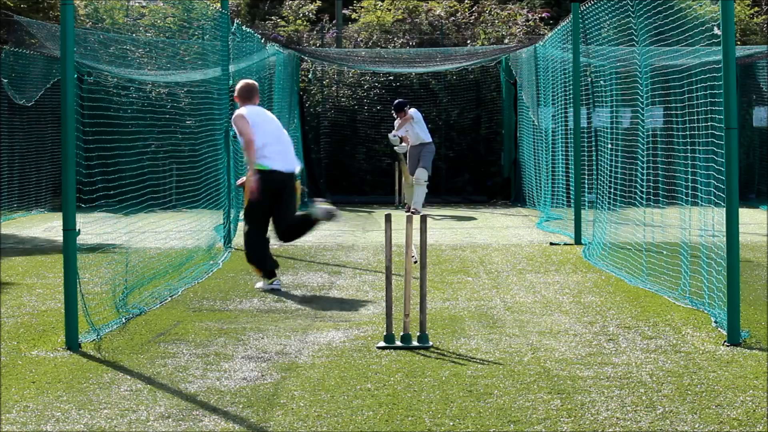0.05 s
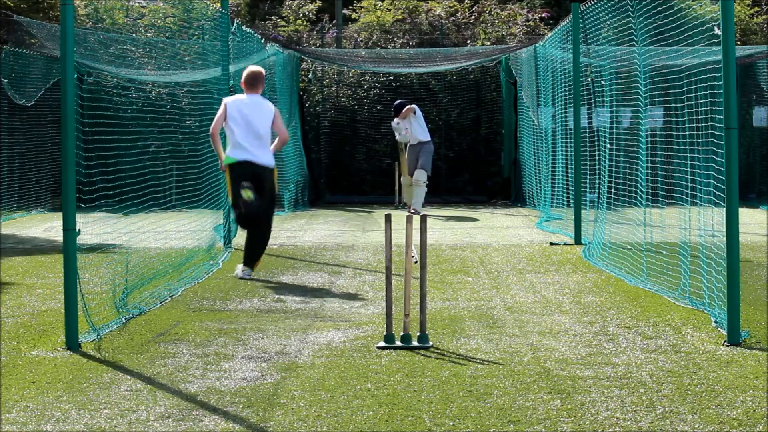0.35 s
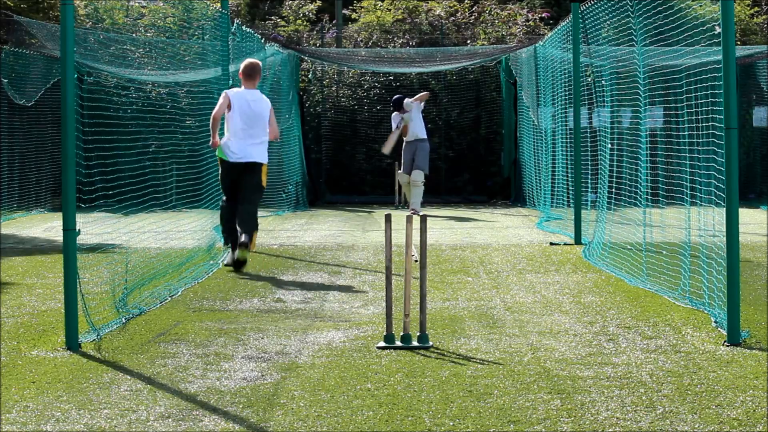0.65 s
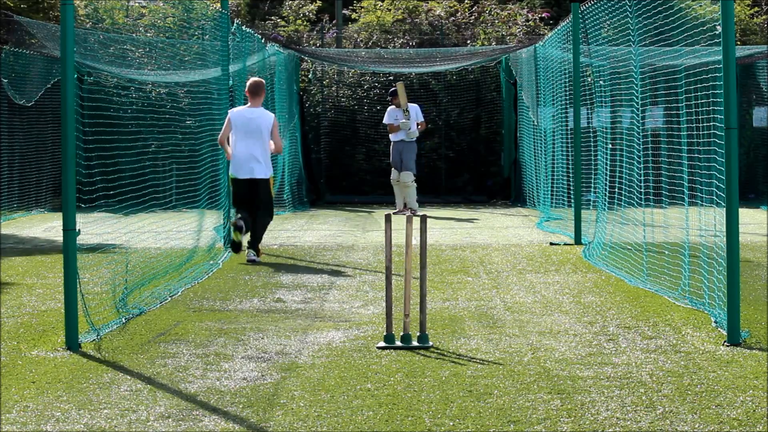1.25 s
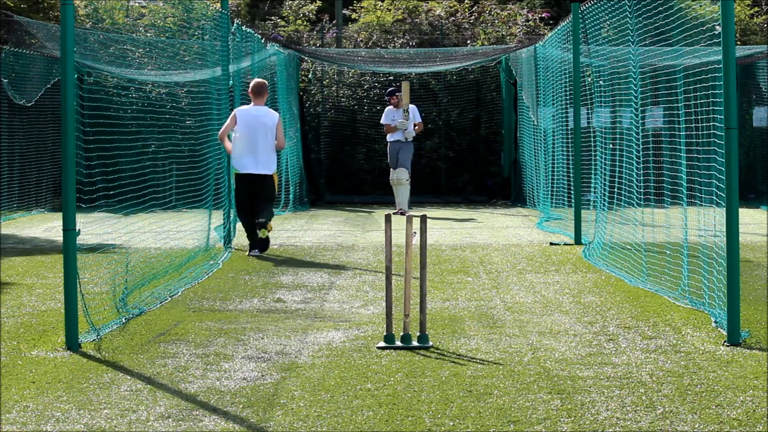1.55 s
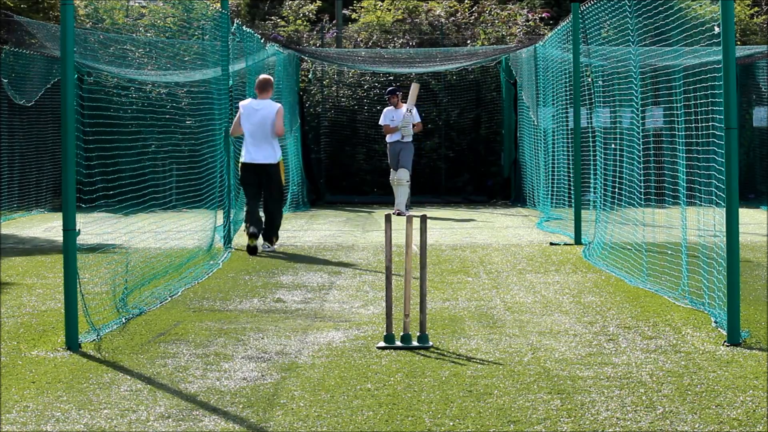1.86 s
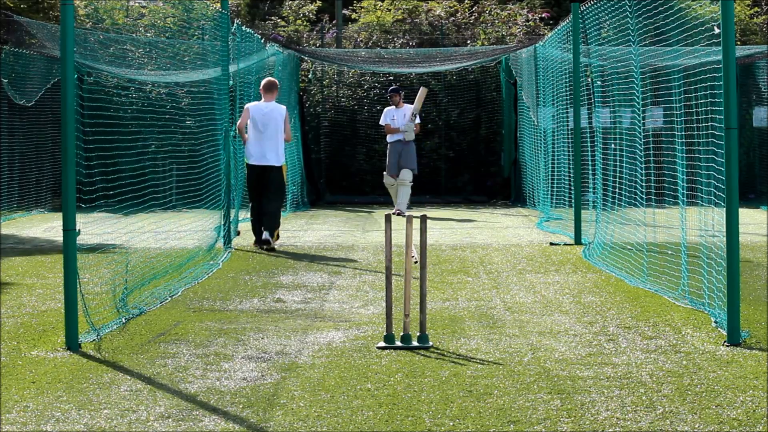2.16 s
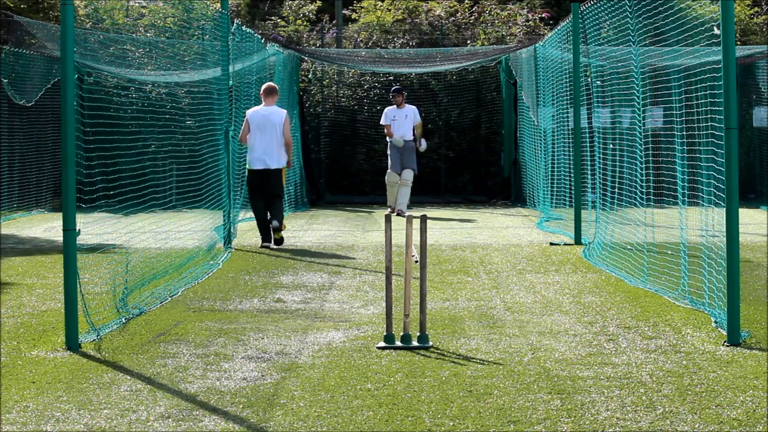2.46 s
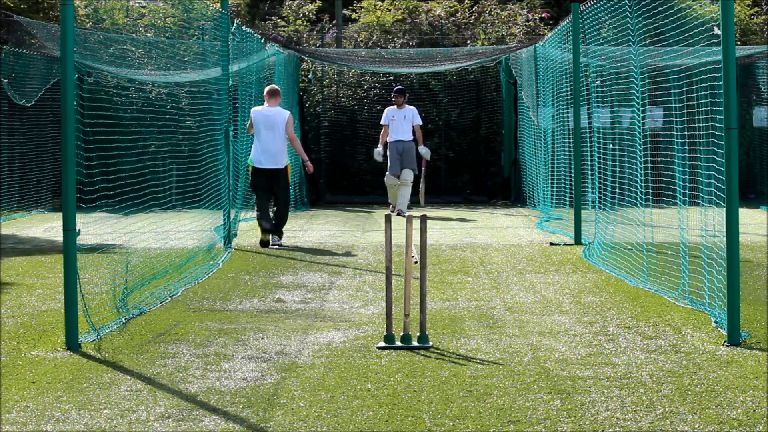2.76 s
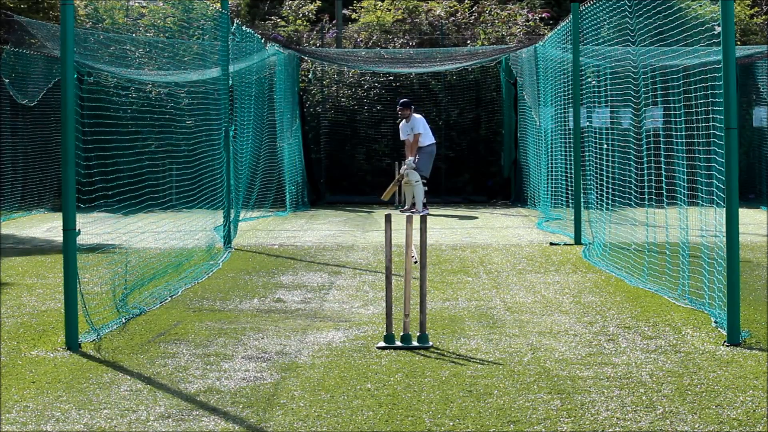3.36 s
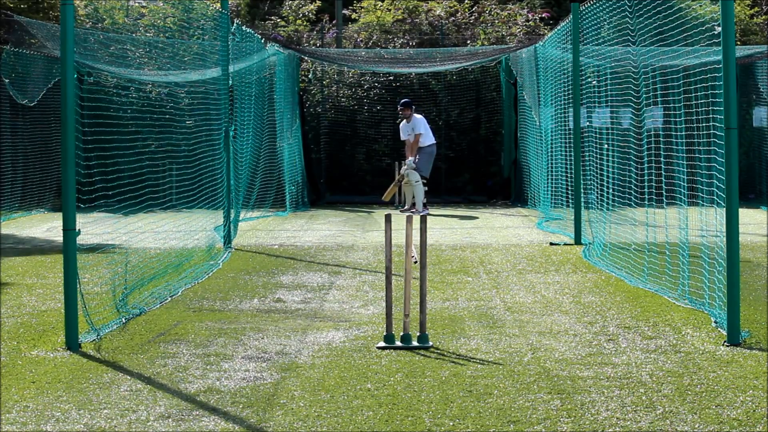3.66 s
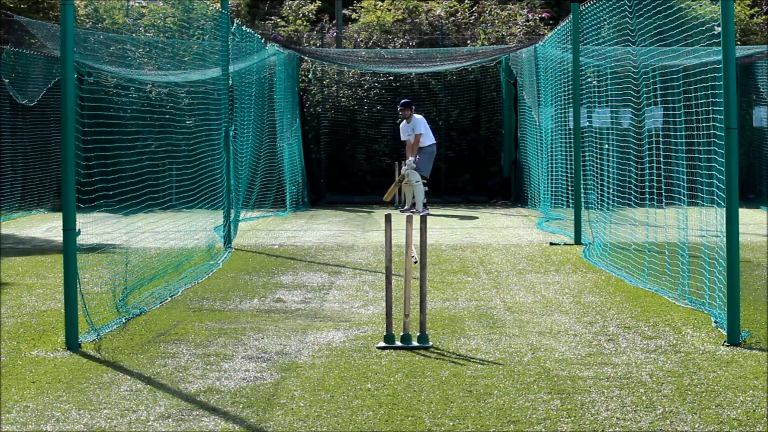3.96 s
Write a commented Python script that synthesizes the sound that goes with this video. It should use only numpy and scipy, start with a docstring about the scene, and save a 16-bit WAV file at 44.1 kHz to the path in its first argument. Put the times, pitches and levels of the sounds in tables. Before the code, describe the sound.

A cricket bat hits a ball with one sharp wooden knock over faint distant traffic.

```python
"""First comes one hard wooden knock, loud enough to overload the microphone: a cricket bat meets the
ball in an outdoor practice net. Walls throw the knock back dully, the yard rings briefly and the ball
thuds away. Distant traffic and a low drone lie under it all. In the last second something rustles
and scuffs on the artificial turf nearby."""
import sys
import numpy as np
from scipy import signal
from scipy.fft import rfft, irfft
from scipy.io import wavfile

SR = 44100
rng = np.random.default_rng(int(sys.argv[2]) if len(sys.argv) > 2 else 0)


def file_out(sig):
    """Save sig as 16-bit WAV at sys.argv[1]."""
    # one column per channel
    cols = np.atleast_2d(sig).T
    # limit, then scale
    lim = np.clip(cols, -1, 1)
    pcm = np.round(lim * 32767).astype(np.int16)
    wavfile.write(sys.argv[1], SR, pcm)


N = 176400  # 4 seconds
HIT_S = .0277  # when the bat meets the ball

# The tones of bat and ball. Columns: pitch_hz, level_db, fade_s (time to fade by 60 dB)
BAT_TONES = [(318, -5.5, 0.017), (812, -2, 0.014), (1160, -10.5, 0.015), (1760, -18, 0.017),
             (2190, -5, 0.014), (3070, -11, 0.0079), (3750, -9.5, 0.0093), (4470, -16, .004),
             (5420, -11, 0.0044), (6080, -14, 0.0049)]
# How strong the crack is from low to high pitch. Columns: pitch_hz, level_db
CRACK_COLOUR = [(1000, -19), (2800, 2), (6000, -2), (7200, -8), (12500, -0.5), (15500, -22)]
def knock():
    """The contact cracks and the wood rings briefly, its lowest tones swelling last."""
    swell_s, lowest_hz = .000706, BAT_TONES[0][0]
    wood = 0
    for pitch_hz, level_db, fade_s in BAT_TONES:
        tone = np.sin(2 * np.pi * pitch_hz * (since(HIT_S) - swell_s))
        rise_s = .0001 + swell_s * lowest_hz / pitch_hz
        wood += undb(level_db) * tone * decay(HIT_S, fade_s, rise_s)
    crack = colour(rng.standard_normal(N), CRACK_COLOUR) * decay(HIT_S, .012, rise=.0001)
    return undb(3) * wood + undb(-17.5) * crack


# Echoes from the walls. Columns: delay_s, level_db, treble_cutoff_hz
WALL_ECHOES = [(.0095, -25, 9000), (0.0384, -12, 2300), (0.0452, -22, 2600)]
def wall_echoes(sound):
    """Each wall sends back one later, quieter, duller copy of the sound."""
    samples = np.arange(N)
    echoes = 0
    for delay_s, level_db, cutoff_hz in WALL_ECHOES:
        delayed = np.interp(samples - delay_s * SR, samples, sound, left=0)
        echoes += undb(level_db) * dull(delayed, cutoff_hz)
    return echoes


# Blurred echoes. Columns: delay_s, level_db, fade_s
FAR_ECHOES = [(.048, -25.5, 0.17), (0.141, -30.5, 0.33)]
# Their tone colour. Columns: pitch_hz, level_db
FAR_COLOUR = [(250, -28), (520, -5), (740, 0), (1050, 4.5), (1550, -17), (2150, -6), (2800, -17),
              (6000, -29), (15000, -55)]
def far_echoes():
    """Hedges and far walls smear the bat's middle tones into short washes of noise."""
    loudness = sum(undb(level_db) * decay(HIT_S + delay_s, fade_s, rise=.0031)
                   for delay_s, level_db, fade_s in FAR_ECHOES)
    return colour(rng.standard_normal(N), FAR_COLOUR) * loudness


# The ring of the yard. Columns: pitch_hz, level_db, fade_s
YARD_RING = [(120, -6, 0.59), (260, -2, .4), (483, -20, 0.93), (746, 0.5, 0.98), (1080, -7.5, 1),
             (1510, -11, 0.74), (2170, -6, 1), (2650, -13, 0.83), (4030, -17.5, 0.69), (7000, -23.5, 0.53),
             (15000, -30, 0.28)]
# Tone colour of the first bounces. Columns: pitch_hz, level_db
SCATTER_COLOUR = [(150, -19), (330, 10), (900, -19), (1500, -3), (2200, 6), (3000, 2), (6000, -6),
                  (9000, -15), (15000, -24)]
def yard():
    """The knock scatters off posts and ground, then leaves a ring whose highest part dies first."""
    pitches_hz, _, fades_s = np.array(YARD_RING).T
    wash = colour(rng.standard_normal(N), YARD_RING)
    ring = 0
    for share, fade_s in zip(np.eye(len(pitches_hz)), fades_s):
        # Pick out the noise around one pitch, so it can fade at its own speed.
        part = shape(wash, lambda hz: np.interp(np.log(hz), np.log(pitches_hz), share))
        ring += part * decay(HIT_S, fade_s, rise=.0048)
    scatter = colour(rng.standard_normal(N), SCATTER_COLOUR) * decay(HIT_S, .11, rise=.0011)
    return undb(-28) * ring + undb(-25) * scatter


# Soft thuds. Columns: start_s, level_db, pitch_hz, fade_s
GROUND_THUDS = [(0.1444, -24.5, 260, 0.055), (3.003, -36, 250, 0.076), (3.043, -33, 750, 0.037),
                (3.108, -33, 450, 0.06), (3.385, -28.5, 383, 0.085), (3.53, -34.5, 684, .06),
                (3.56, -38.5, 115, 0.16), (3.592, -40.5, 1190, 0.13), (3.864, -36, 780, 0.067)]
def thuds():
    """Ball and feet land on soft ground with short, dull blows."""
    return sum(undb(level_db) * band(pitch_hz, 2.1 * pitch_hz) * decay(start_s, fade_s, rise=.0016)
               for start_s, level_db, pitch_hz, fade_s in GROUND_THUDS)


def grains():
    """Gritty noise: each sample gets a random boost of up to 15 dB."""
    return rng.standard_normal(N) * undb(3 * np.minimum(rng.exponential(size=N), 5))


# Tone colour of the rustle. Columns: pitch_hz, level_db
RUSTLE_COLOUR = [(150, -31), (400, 1.5), (1000, 1.5), (2200, -10), (4500, -23), (9000, -25), (15000, -27)]
# Scuffs on the turf. Columns: start_s, length_s, level_db
TURF_SCUFFS = [(3.18, 0.032, -50), (3.264, 0.02, -43), (3.317, 0.19, -49.5), (3.588, 0.1, -45),
               (3.818, 0.023, -57), (3.854, 0.041, -43.5), (3.896, 0.042, -44.5), (3.955, 0.05, -64)]
# Their tone colour. Columns: pitch_hz, level_db
SCUFF_COLOUR = [(500, 7.5), (2000, 2), (4500, -0.5), (9000, -9), (13500, -8), (16000, -11)]
# Ticks of grit. Columns: start_s, level_db, pitch_hz, width_hz, fade_s
GRIT_TICKS = [(3.323, -31.5, 1900, 900, 0.046), (3.3418, -26, 3130, 2970, 0.0085),
              (3.433, -43, 13000, 7000, .012), (3.709, -33.5, 4000, 6000, 0.0083),
              (3.782, -41, 12000, 12000, 0.0096), (3.966, -45, 12800, 4000, .014)]
def turf():
    """Something rubs over the turf: an uneven rustle, gritty scuffs and a few ticks."""
    start_s, rise_s = 2.99, .031
    fade_in = np.minimum(since(start_s) / rise_s, 1)
    rustle = colour(grains(), RUSTLE_COLOUR) * fade_in * undb(-44.5 + 2.5 * walk(12))
    pressure = sum(undb(level_db) * np.sin(np.pi * np.minimum(since(start_s) / length_s, 1))
                   for start_s, length_s, level_db in TURF_SCUFFS)
    ticks = sum(undb(level_db) * band(pitch_hz, width_hz) * decay(start_s, fade_s, rise=.0001)
                for start_s, level_db, pitch_hz, width_hz, fade_s in GRIT_TICKS)
    scuffs = pressure * colour(grains(), SCUFF_COLOUR)
    return rustle + scuffs + ticks


# Tone colour of distant traffic. Columns: pitch_hz, level_db
TRAFFIC_COLOUR = [(12, -53), (20, -23.5), (53, -3), (85, -6), (122, -4), (175, -6.5), (213, -6),
                  (252, -5.5), (289, -6.5), (324, -9), (362, -11.5), (857, -7.5), (1450, -12), (2270, -21),
                  (3350, -25), (8400, -37), (15500, -41)]
# How loud the engine drone is over time. Columns: time_s, level_db
DRONE_LEVELS = [(0, -51), (1.2, -52.5), (2.1, -48.5), (2.85, -52.5), (3.05, -70), (4, -74)]
def traffic():
    """Far traffic blends into a wash that swells slightly, with one low engine drone."""
    wash = colour(rng.standard_normal(N), TRAFFIC_COLOUR)
    swell_db = .35 * walk(.81)
    flicker_db = .45 * walk(27)
    drone_db = np.interp(since(0), *np.array(DRONE_LEVELS).T)
    drone = band(hz=210.5, width_hz=15.2) * undb(drone_db)
    return wash * undb(-40 + swell_db + flicker_db) + drone


def scene():
    """The knock and its echoes over the quieter sounds, in one channel."""
    hit = knock()
    return (hit + wall_echoes(hit) + far_echoes() + yard() + thuds() + traffic() + turf())[None]


def record(dry):
    """The overload flattens the knock's peaks, then the highest treble is cut away."""
    cutoff_hz = 15800
    treble_cut = signal.ellip(10, .1, 70, cutoff_hz, fs=SR, output="sos")
    return signal.sosfilt(treble_cut, np.clip(dry, -1, 1))


# Small tools used by the sounds above.
def undb(db):
    """Turn decibels into a number to multiply by."""
    return 10 ** (np.asarray(db) / 20)


def unit(x):
    """Scale a sound to an average strength (rms) of 1."""
    return x / np.sqrt(np.mean(x ** 2))


def shape(x, gain):
    """Turn each pitch up or down by gain(hz)."""
    hz = np.maximum(np.arange(N // 2 + 1) * SR / N, 1)
    return irfft(rfft(x) * gain(hz), N)


def colour(x, points):
    """Give a sound a tone colour from (pitch_hz, level_db) rows, at strength 1."""
    pitches_hz, levels_db = np.array(points).T[:2]
    return unit(shape(x, lambda hz: undb(np.interp(np.log(hz), np.log(pitches_hz), levels_db))))


def band(hz, width_hz):
    """Noise gathered around one pitch, at strength 1."""
    return unit(shape(rng.standard_normal(N), lambda f: 1 / (1 + ((f - hz * hz / f) / width_hz) ** 2)))


def dull(x, hz):
    """Soften the treble above hz."""
    return signal.sosfilt(signal.butter(2, hz, fs=SR, output="sos"), x)


def since(start_s):
    """Seconds since a moment, zero before it."""
    return np.maximum(np.arange(N) / SR - start_s, 0)


def decay(start_s, fade_s, rise):
    """Swell in about `rise` seconds, and fall by 60 dB every fade_s."""
    age_s = since(start_s)
    return (1 - np.exp(-age_s / rise)) * np.exp(-np.log(1000) * age_s / fade_s)


def walk(rate_hz):
    """A smooth random wander, typically 1 away from zero."""
    return unit(shape(rng.standard_normal(N), lambda hz: np.exp(-hz / rate_hz)))


dry = scene()
out = record(dry)
file_out(out)
```